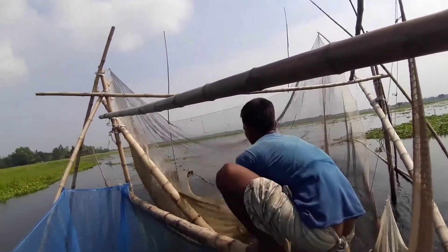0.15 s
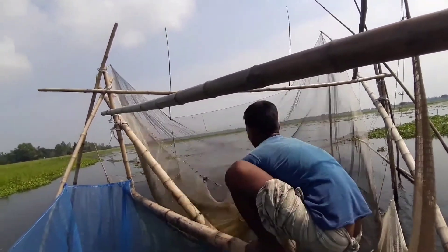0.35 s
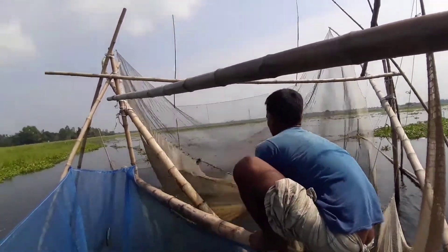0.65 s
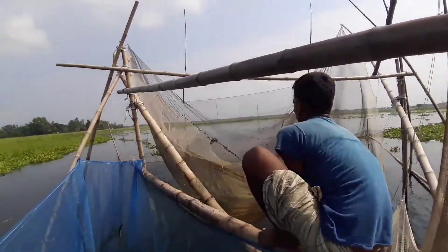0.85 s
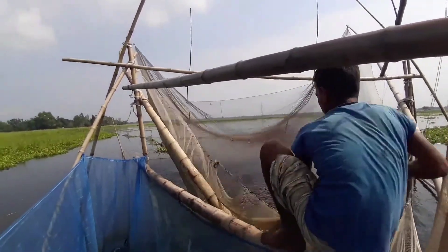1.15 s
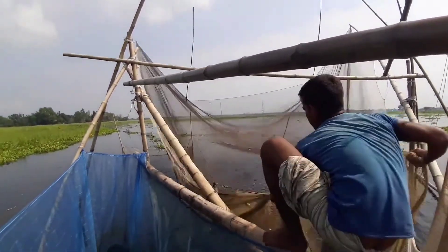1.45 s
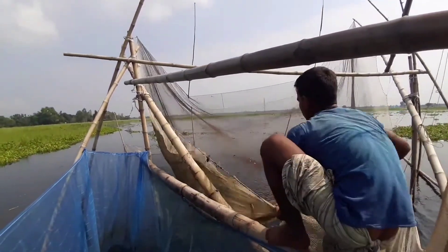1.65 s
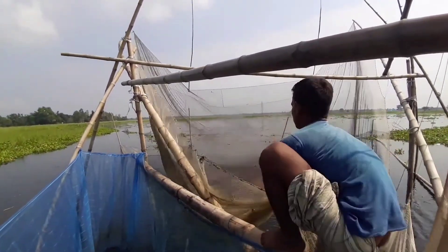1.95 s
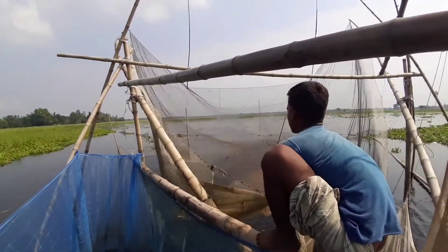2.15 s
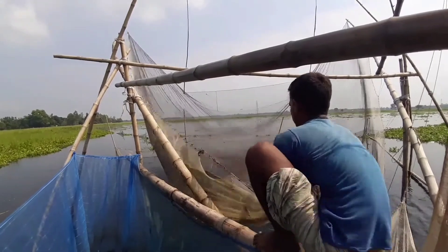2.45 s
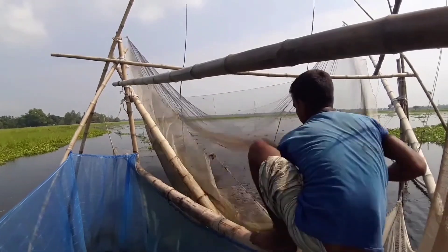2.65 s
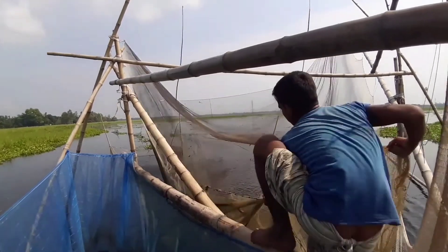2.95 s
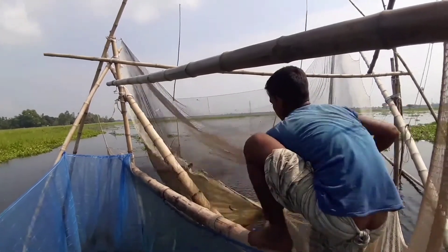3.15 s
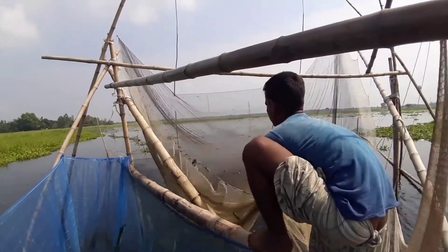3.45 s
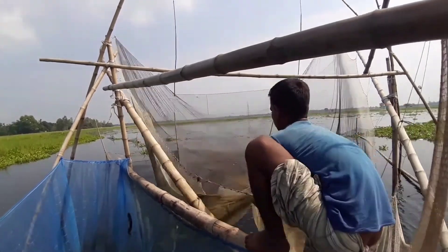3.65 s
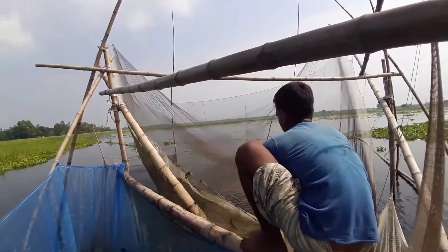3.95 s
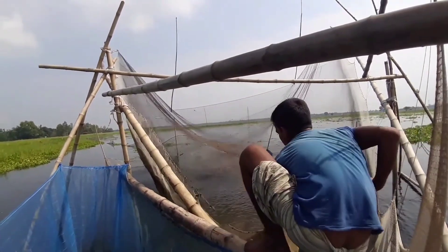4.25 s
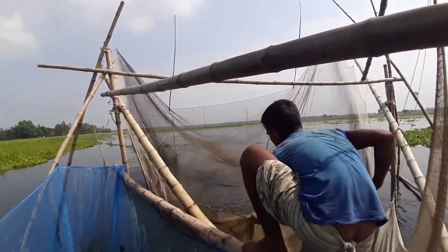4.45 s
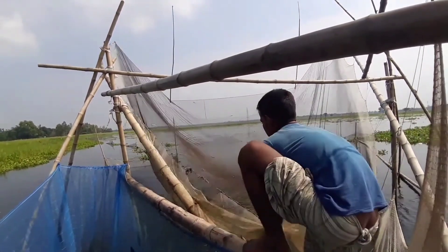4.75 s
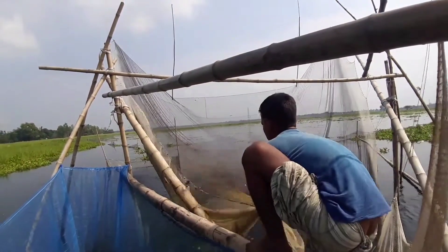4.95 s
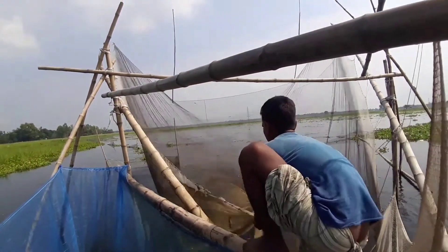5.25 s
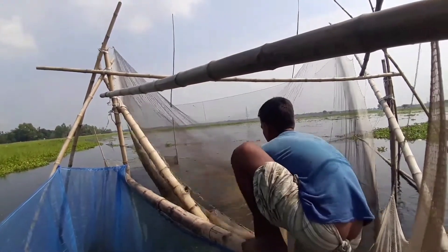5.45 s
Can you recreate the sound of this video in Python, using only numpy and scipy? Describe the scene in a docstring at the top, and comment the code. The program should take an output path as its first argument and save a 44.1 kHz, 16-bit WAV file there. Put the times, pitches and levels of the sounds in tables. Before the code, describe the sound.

Close, wet outdoor sound: small waves slosh in uneven bursts, drops tick crisply off mesh, and trapped air plops and glugs. Quiet trickling fills the gaps over a faint airy hush. After a sparser middle, water gushes and drums on hollow boards, eases briefly, then splashes busily again to the end. Low wind buffeting on the stereo microphone swells late; there is almost no echo.

```python
"""Water laps, glugs and trickles around a lift net and its bamboo frame, heard from a boat on a flooded field.
Laps and trickle are clouds of ringing bubbles over coloured noise; splashes are dying noise bursts.
Drops ping off the mesh, air pockets plop, cavities glug upward, and two bigger surges drum on hull modes.
A faint chirp sounds in two notes; behind lie the field's hush and a light wind rumbling on the microphone ports."""
import sys
import numpy as np
from scipy import signal
from scipy.fft import rfft, irfft, next_fast_len
from scipy.io import wavfile
from scipy.ndimage import uniform_filter1d, map_coordinates

SR = 44100
rng = np.random.default_rng(int(sys.argv[2]) if len(sys.argv) > 2 else 0)


def inscribe(sig):
    """Save sig as 16-bit PCM at rate SR to the path in sys.argv[1].

    A 1-D sig is mono; a 2-D sig holds one channel per row.
    Samples are clipped to [-1, 1] before scaling.
    """
    pcm = np.round(np.clip(np.atleast_2d(sig).T, -1, 1) * 32767)
    wavfile.write(sys.argv[1], SR, pcm.astype(np.int16))


N = 247401

# waves lapping through the net; rise and fall span 20 dB:
# (crest [s], rise [s], slosh fall [s], slosh level [dB], churn level [dB], spray level [dB])
LAPS = [(.01, 0.016, 0.18, -56, -50, -73), (.29, 0.016, 0.42, -69, -54.5, -58.5),
        (0.622, 0.065, 0.23, -46, -53, -48), (.87, 0.089, 0.29, -47, -46.5, -49.5),
        (1.29, 0.045, 0.31, -62, -62.5, -53.5), (1.564, 0.012, 0.11, -60, -57, -47),
        (1.681, 0.05, 0.21, -50.5, -51, -46.5), (2.199, 0.042, 0.1, -58, -60, -50),
        (2.5, 0.77, 0.97, -56, -67, -57), (2.95, 0.13, 0.23, -57.5, -86, -58),
        (3.41, 0.057, 0.059, -51.5, -74, -53.5), (3.59, .04, 0.1, -57, -53, -43),
        (3.67, 0.05, 0.21, -51.5, -57, -55), (3.923, 0.075, 0.4, -53.5, -66, -49.5),
        (4.02, 0.071, 0.14, -56, -76, -65), (4.248, 0.057, 0.35, -56, -85, -51),
        (4.389, 0.044, 0.076, -47.5, -37, -42.5), (4.55, 0.32, 0.27, -50, -38, -70),
        (4.68, .08, 0.17, -51, -61, -50.5), (4.87, 0.13, 0.31, -56, -54.5, -51.5),
        (5.048, 0.021, 0.067, -55.5, -52, -50.5), (5.29, 0.11, 0.23, -50.5, -49.5, -44),
        (5.358, 0.055, 0.038, -57, -43.5, -36), (5.45, 0.18, 0.094, -54.5, -51.5, -57.5)]
CHURN_FALL_RATIO, SPRAY_FALL_RATIO = 0.74, 0.79  # over the slosh fall
# flow of the steady trickle from the mesh, used about its mean: (time [s], level [dB])
TRICKLE = [(0.0, -54), (0.58, -68.5), (0.83, -54.5), (1.36, -60.5), (1.64, -56), (1.95, -61), (2.47, -56.5),
           (2.83, -59), (3.12, -55.5), (3.39, -60.5), (4.33, -65), (4.53, -48.5), (4.98, -70), (5.13, -60),
           (5.28, -73.5), (5.61, -57.5)]
FLOW_SPRAY_DB, FLOW_SLOSH_DB, FLOW_CHURN_DB = -60, -65, -80  # each part at the mean flow
SLOSH_DB_PER_FLOW_DB, CHURN_DB_PER_FLOW_DB = 0.86, 3.7
# spectrum of deep churning: (frequency [Hz], gain [dB])
CHURN = [(130, -57), (250, -15.5), (400, -8), (560, 1), (750, 1.5), (1100, 10), (2200, -29)]
# spectrum of the froth: (frequency [Hz], gain [dB])
SLOSH = [(400, -41), (650, -22), (850, -7.5), (1100, -1.5), (1700, 0), (2500, 5.5), (3600, 0.5), (5500, 2),
         (9000, -55)]
# spectrum of the spray: (frequency [Hz], gain [dB])
SPRAY = [(1200, -7), (2500, 0.5), (3800, 1), (5200, -2.5), (7000, 4), (9200, 6), (9800, 1.5), (15500, 1)]
# crests breaking: (time [s], level [dB], pitch [Hz], t60 [s], spray over gush [dB])
SPLASHES = [(.005, -38, 1010, 0.075, -17), (.266, -39.5, 2930, 0.11, -42), (.283, -44, 1140, 0.12, 4),
            (.592, -35, 2680, 0.16, -20), (.848, -36, 715, 0.032, -23), (1.556, -44.5, 1480, 0.48, -2),
            (1.71, -37.5, 1160, 0.026, 4), (1.801, -44, 1520, 0.14, 2), (2.178, -37.5, 975, .034, 5),
            (2.941, -38.5, 2700, 0.081, -14), (3.565, -38.5, 1700, 0.06, 2),
            (3.918, -29.5, 1030, 0.023, 8.5), (4.361, -29, 1720, 0.032, -6), (4.525, -39, 920, 0.45, -17),
            (5.189, -36.5, 1430, 0.12, -16), (5.229, -35, 1400, 0.15, -3), (5.274, -30, 825, 0.14, -6),
            (5.349, -29.5, 1110, .08, 7.5)]
# nearest drops hitting the surface: (time [s], level [dB], pitch [Hz], lead at the left port [ms])
DROPS = [(.039, -37, 8200, 0), (.182, -29.5, 12100, .01), (.279, -25.5, 3020, -.29),
         (.282, -26.5, 6050, -.29), (.428, -39, 8100, 0), (0.598, -26.5, 3380, .22),
         (0.611, -33, 3550, .22), (0.625, -30.5, 6300, .2), (0.94, -28, 7700, .02), (.992, -36.5, 7700, 0),
         (1.083, -36.5, 8300, 0), (1.353, -42, 10100, 0), (1.558, -27.5, 7900, -.11),
         (1.672, -27.5, 8750, -.11), (1.836, -31, 5700, .02), (2.027, -33, 8950, .04),
         (2.214, -34, 7400, -0.0017), (2.319, -31, 8750, .11), (2.356, -30.5, 8200, .09),
         (2.63, -33.5, 8800, 0), (3.035, -32, 9800, 0), (3.071, -32, 3100, .05), (3.397, -39.5, 4300, .02),
         (3.672, -29.5, 4000, .18), (3.764, -33, 6570, -.3), (3.924, -23.5, 8900, .09),
         (3.974, -31.5, 7300, 0), (4.13, -37, 10500, 0), (4.335, -29.5, 7240, .04),
         (4.423, -30, 1410, 0.153), (4.562, -27.5, 8600, .12), (4.563, -25.5, 3320, .18),
         (4.593, -21, 6800, -.13), (4.687, -28, 8900, -.11), (5.107, -33, 9000, .13),
         (5.194, -30.5, 6700, .02), (5.266, -27, 7500, .13), (5.319, -25, 6940, .13),
         (5.352, -32, 7600, .13), (5.361, -29, 4140, .13)]
DRIP_DB, DRIP_SPREAD_DB, DRIP_HZ, DRIP_SPREAD_OCTAVES = -43, 13.5, 9300, 0.27  # smaller random drips
# air pockets snapping shut: (time [s], level [dB], starting pitch [Hz])
PLOPS = [(.162, -36, 1510), (0.357, -35.5, 1275), (0.409, -51, 1400), (0.592, -23.5, 1750),
         (0.721, -43.5, 870), (.915, -34.5, 1150), (1.283, -33.5, 2100), (1.607, -30, 2050),
         (1.833, -34, 1600), (2.312, -34.5, 2230), (2.859, -28, 1740), (2.983, -30, 1880),
         (3.035, -47, 1090), (3.395, -34, 2120), (3.587, -32.5, 1430), (3.671, -26.5, 1760),
         (4.537, -19.5, 1018), (4.823, -37, 1460), (4.871, -28.5, 1570), (5.109, -38, 1350),
         (5.138, -31.5, 1380), (5.255, -26.5, 557), (5.292, -31, 990), (5.316, -19, 1310),
         (5.374, -38, 1240), (5.403, -34, 567)]
PLOP_T60_CYCLES = 31.6  # so big pockets ring longer
# shrinking air cavities: (time [s], level [dB], middle pitch [Hz], length [s])
GLUGS = [(.323, -49, 268, 0.035), (0.385, -47, 275, 0.028), (.41, -52.5, 166, .06),
         (1.618, -49.5, 583, 0.038), (1.696, -49, 1100, 0.025), (1.936, -52, 305.5, 0.059),
         (2.11, -53, 1110, 0.021), (2.196, -52.5, 605, 0.021), (2.216, -52, 1020, 0.016),
         (2.234, -51, 1119, 0.058), (2.462, -49.5, 244, .027), (2.63, -46.5, 164, 0.026),
         (2.672, -39, 252, 0.023), (2.785, -49, 854, 0.025), (2.8, -47.5, 1460, .022),
         (3.335, -49.5, 137, 0.036), (3.434, -59, 340, 0.069), (3.632, -43, 640, .03),
         (3.818, -53.5, 235, 0.044), (4.396, -32, 167, 0.0264), (5.061, -46.5, 256, 0.041),
         (5.463, -47.5, 1684, 0.035)]
GLUG_OCTAVES_PER_S = 22.8  # climb of every cavity, before its waver
# surges striking the hull: (time [s], level [dB])
BLOWS = [(4.385, -23.5), (4.406, -23), (4.419, -19), (4.474, -19.5), (4.49, -25.5), (4.535, -20.5),
         (4.562, -22.5), (5.253, -23), (5.289, -26), (5.316, -21.5), (5.358, -28.5)]
# modes of the hull: (frequency [Hz], width [Hz], gain [dB])
HULL = [(168, 270, -9), (556, 88, 0.5), (1065, 99, -1.5), (1530, 83, -9), (2060, 114, -5.5)]
# soft bumps of the rocking boat: (time [s], level [dB])
BUMPS = [(2.167, -50), (2.342, -46.5), (3.068, -50), (3.344, -47.5), (4.124, -41.5), (4.17, -44),
         (4.301, -43), (4.327, -35), (4.863, -44), (5.345, -41), (5.437, -46)]
BUMP_HZ = 86
# faint high chirp in two notes: (time [s], pitch [Hz], level [dB])
CHIRP = [(1.12, 4100, -69), (1.142, 4280, -47), (1.165, 4280, -50), (1.183, 4350, -56),
         (1.198, 4260, -46.5), (1.215, 4030, -46), (1.24, 3920, -79)]
# scatter from hull, poles and water: (frequency [Hz], t60 [s])
SCATTER = [(200, 0.022), (2000, 0.15), (10000, 0.017)]
# stereo width of everything but drops and wind: (frequency [Hz], side gain [dB])
WIDTH = [(100, 7), (500, -3.5), (2000, -3), (5000, 1), (7000, 0.5), (9500, -29.5), (14000, -30)]
# spectrum of the field's hush: (frequency [Hz], gain [dB])
AIR = [(88, -35), (150, -7), (453, -16), (1340, 8), (1700, 9.5), (2860, 1.5), (3830, 3.5), (5230, 5),
       (8660, 8.5), (14300, 5), (15500, -37)]
# puffs of wind; the sign of the width has no effect and a zero width is silent:
# (crest [s], width to swell or fade by 20 dB [s], rumble level [dB])
GUSTS = [(.37, -0.4, -65.5), (.82, .13, -58), (1.14, .13, -60.5), (1.65, 0.5, -61.5), (1.92, 0.6, -60),
         (2.28, 0.2, -61.5), (2.63, 0.43, -57), (3.1, 0, -57), (3.38, 0.22, -58.5), (3.88, 0.27, -55.5),
         (4.15, 0.02, -55), (4.36, 0.31, -48.5), (4.52, -0.04, -46), (4.72, 0.12, -49.5), (4.87, .13, -50),
         (5.22, .14, -52.5), (5.35, 0.4, -49.5), (5.48, -0.2, -56)]
# spectrum of wind on the ports: (frequency [Hz], gain [dB])
RUMBLE = [(20, -21.5), (35, -14), (52, -0.5), (68, -4), (90, -4), (160, -13), (260, -22.5), (500, -42.5),
          (1500, -92)]
BREEZE_DB, LUMPS_DB, LUMPS_PER_S = -80, 2.5, 18  # rumble between puffs; depth and rate of the buffeting
TOP_HZ = 15780


def stirred_water():
    """Laps and trickle: deep churning, a froth of bubbles, and a crackle of spray draining from the mesh."""
    slosh_gain, churn_gain, spray_gain = stirring_gains()
    pockets = bubbles(count=2500, low_hz=212.6, high_hz=848, cycles=6.9, rise=0.35, spread_db=3.5)
    froth = bubbles(count=3200, low_hz=650, high_hz=4800, cycles=22, rise=.2, spread_db=4)
    crackle = bubbles(count=7000, low_hz=3000, high_hz=16000, cycles=9, rise=.1, spread_db=4.5)

    churn = churn_gain * amp(-6.0) * wash(pockets, CHURN, lead_ms=0.33, diffuse_db=-17)

    froth_wash = wash(froth, SLOSH, lead_ms=0.17, diffuse_db=-6.5)
    slosh = slosh_gain * amp(1.28) * patchy(froth_wash, depth_db=3.5)

    spurts_db = 1.9 * wobble(130)  # the mesh sheds its water in quick spurts
    spray_wash = wash(crackle, SPRAY, lead_ms=0.0082, diffuse_db=11.5)
    spray = spray_gain * amp(spurts_db + 2.5) * patchy(spray_wash, depth_db=3.0)
    return churn + slosh + spray


def stirring_gains():
    """Gains of slosh, churn and spray: waves on top of a trickle that bubbles more as it flows faster."""
    flow_db = curves(TRICKLE)[0]
    flow_db = flow_db - flow_db.mean()
    slosh = swells([(s, rise, fall, db) for s, rise, fall, db, _, _ in LAPS])
    churn = swells([(s, rise, fall * CHURN_FALL_RATIO, db) for s, rise, fall, _, db, _ in LAPS])
    spray = swells([(s, rise, fall * SPRAY_FALL_RATIO, db) for s, rise, fall, _, _, db in LAPS])
    steady = amp([FLOW_SLOSH_DB + SLOSH_DB_PER_FLOW_DB * flow_db,
                  FLOW_CHURN_DB + CHURN_DB_PER_FLOW_DB * flow_db,
                  FLOW_SPRAY_DB + flow_db])
    return np.sqrt(np.array([slosh, churn, spray]) + steady ** 2)


def bubbles(count, low_hz, high_hz, cycles, rise, spread_db):
    """A cloud of ringing bubbles of rms 1; each climbs in pitch as it nears the surface."""
    start, pitch, life, strength = rng.random((count, 4)).T
    hz = low_hz * (high_hz / low_hz) ** pitch
    samples = (cycles * (.5 + life) / hz * SR).astype(int) + 1
    # all bubbles laid end to end: owner and sample index within it
    which = np.repeat(np.arange(count), samples)
    k = np.arange(len(which)) - (np.cumsum(samples) - samples)[which]
    age = k / samples[which]
    turns = k / SR * hz[which]
    loudness = amp(-spread_db * np.log(1 - .97 * strength))[which]
    envelope = (1 - age) ** 2 * np.exp(-2 * age) * (1 - np.exp(-turns))
    ring = loudness * envelope * np.sin(2 * np.pi * turns * (1 + rise * age / 2))
    position = (start * N).astype(int)[which] + k
    return unit(np.bincount(position, ring, N)[:N])


def wash(grains, spectrum, lead_ms, diffuse_db):
    """Near bubbles from one bearing, on the diffuse rush of the many further away."""
    diffuse = amp(diffuse_db) * rng.standard_normal((2, N))
    return coloured(ports(grains, lead_ms) + diffuse, spectrum)


def patchy(pair, depth_db):
    """Clusters of like-sized droplets lift and dim small patches of time and frequency."""
    z = signal.stft(pair, nperseg=256)[2]
    field = rng.standard_normal(z.shape[1:])
    for axis in (0, 1):
        field = uniform_filter1d(field, size=5, axis=axis)
    return unit(signal.istft(z * amp(depth_db * unit(field)), nperseg=256)[1][:, :N])


def splashes():
    """A wave breaks at once into a gush and a hiss of spray that die together."""
    out, t = np.zeros(N), np.arange(SR // 4) / SR
    attack = 1 - np.exp(-t / .003)
    for s, db, hz, t60_s, spray_db in SPLASHES:
        gush = burst(t, t60_s, lambda f: resonance(f, hz, 0.74 * hz) ** 2)
        hiss = burst(t, t60_s, lambda f: amp(along(SPRAY, f)))
        add(out, s, amp(db) * (gush + amp(spray_db) * hiss) * attack)
    return out


def drops():
    """A drop lands at its own bearing, pings for a few cycles and leaves a fizz that spreads around it."""
    out, t = np.zeros((2, N)), np.arange(SR // 16) / SR
    for s, db, hz, lead_ms in DROPS + drips(count=30):
        age = t * hz / 1.3
        ping = age * np.exp(1 - age) * np.sin(2 * np.pi * hz * t)
        crack = burst(t, .011, lambda f: resonance(f, hz, 1.2 * hz)) * (1 - np.exp(-t / .0003))
        centre, spread = [burst(t, 0.065, lambda f: resonance(f, hz, 0.6 * hz)) for _ in range(2)]
        fizz = amp(-11.5) * centre + amp(-17.5) * np.array([spread, -spread])
        landing = ports(amp(-2.5) * ping + crack, lead_ms) + fizz
        for channel, sound in zip(out, landing):
            add(channel, s, amp(db) * sound)
    return out


def drips(count):
    """Rows like those of DROPS for the small drips off the mesh almost straight ahead."""
    when, size, pitch, bearing = rng.uniform(-1, 1, (count, 4)).T
    time_s = (when + 1) / 2 * N / SR
    level_db = DRIP_DB + DRIP_SPREAD_DB * size
    pitch_hz = DRIP_HZ * 2 ** (DRIP_SPREAD_OCTAVES * pitch)
    return list(zip(time_s, level_db, pitch_hz, 0.022 * bearing))


def plops():
    """A trapped pocket of air rings briefly at a rising pitch, with a wet smack around it."""
    out, t = np.zeros(N), np.arange(SR // 8) / SR
    for s, db, hz in PLOPS:
        t60_s = PLOP_T60_CYCLES / hz
        envelope = amp(-60 * t / t60_s) * (1 - np.exp(-t / .0014))
        ring = np.sin(2 * np.pi * hz * t * (1 + 3 * t)) * envelope
        smack = burst(t, 0.5 * t60_s, lambda f: resonance(f, hz, 0.33 * hz) ** 2)
        add(out, s, amp(db - 7.5) * (ring / np.abs(ring).max() + amp(2.5) * smack))
    return out


def glugs():
    """Water squeezes a cavity, so that its ragged note climbs while the water gurgles around it."""
    out, t = np.zeros(N), np.arange(SR // 6) / SR
    for s, db, middle_hz, length_s in GLUGS:
        u = np.linspace(0, 1, int(length_s * SR))
        waver, flutter = [map_coordinates(rng.standard_normal(8), [u * 7]) for _ in range(2)]
        hz = middle_hz * 2 ** (GLUG_OCTAVES_PER_S * length_s * (u - .5)) * (1 + 0.112 * waver)
        note = np.sin(np.pi * u) * np.sin(2 * np.pi * np.cumsum(hz) / SR)
        add(out, s, amp(db - 2.5 + 2.0 * flutter) * note)
        gurgle = burst(t, 4.8 * length_s, lambda f: resonance(f, 1.03 * middle_hz, 1.26 * middle_hz) ** 2)
        add(out, s, amp(db + 1.5) * gurgle * (1 - np.exp(-t / .025)))
    return out


def hull():
    """Each blow of a surge is a short rattle of water on the modes of the hollow boards."""
    def boards(f):
        # neighbouring modes alternate in sign
        return sum((-1) ** k * amp(db) * resonance(f, hz, width_hz)
                   for k, (hz, width_hz, db) in enumerate(HULL))

    out, t = np.zeros(N), np.arange(SR // 8) / SR
    for s, db in BLOWS:
        add(out, s, amp(db - 7.5) * burst(t, 0.057, boards))
    return out


def bumps():
    """The rocking boat bumps softly: a low sine in a Gaussian envelope."""
    out, t = np.zeros(N), np.arange(SR // 8) / SR
    thud = np.sin(2 * np.pi * BUMP_HZ * t) * np.exp(-((t - .01) / 0.0054) ** 2)
    for s, db in BUMPS:
        add(out, s, amp(db) * thud)
    return out


def chirp():
    """A thin, quavering note sounds twice: a sine of jittered pitch and level."""
    hz, db = curves(CHIRP)
    t = np.arange(N) / SR
    sounding = (t > CHIRP[0][0]) & (t < CHIRP[-1][0])
    quaver = 1 + .025 * wobble(600)
    return sounding * amp(db + 0.7 * wobble(200)) * np.sin(2 * np.pi * np.cumsum(hz * quaver) / SR)


def field_air():
    """The hush of the open field: steady coloured noise, independent per channel."""
    return amp(-63) * coloured(rng.standard_normal((2, N)), AIR)


def wind():
    """Low buffeting that swells with each puff: unrelated noise on the two ports, lumps in common."""
    pair = coloured(rng.standard_normal((2, N)), RUMBLE)
    puffs = swells([(s, width_s, width_s, db) for s, width_s, db in GUSTS])
    strength = np.sqrt(puffs + amp(BREEZE_DB) ** 2)
    return strength * amp(LUMPS_DB * wobble(LUMPS_PER_S)) * pair * amp([[-1.3], [1.3]])


def placed(x, lead_ms, scatter_db):
    """A source left of centre; the boat and poles scatter a short tail."""
    hz, t, z = signal.stft(rng.standard_normal((2, SR // 6)), SR, nperseg=256)
    decay = amp(-60 * t / along(SCATTER, hz)[:, None])
    tail = signal.istft(z * decay, SR, nperseg=256)[1]
    scattered = signal.fftconvolve(x[None], tail / np.linalg.norm(tail[0]), axes=1)[:, :N]
    return ports(x, lead_ms) + amp(scatter_db) * scattered


def ports(x, lead_ms):
    """Left and right signals of a sound that reaches the left port lead_ms before the right."""
    sides = np.array([[1], [-1]])
    return filtered(x, lambda hz: np.exp(1j * np.pi * hz * lead_ms / 1000 * sides))


def narrowed(pair):
    """Side signal shaped by WIDTH: wide in the lows, near the centre in the top treble."""
    mid = (pair[0] + pair[1]) / 2
    side = filtered((pair[0] - pair[1]) / 2, lambda hz: amp(along(WIDTH, hz)))
    return np.array([mid + side, mid - side])


def swells(rows):
    """Summed power of (crest s, rise s, fall s, dB) swells that grow and die away evenly in dB."""
    t, power = np.arange(N) / SR, np.zeros(N)
    for crest_s, rise_s, fall_s, db in rows:
        away = np.maximum((crest_s - t) / rise_s, (t - crest_s) / fall_s)
        near = away < 3  # cut 60 dB below the crest
        power[near] += amp(db - 20 * away[near]) ** 2
    return power


def burst(t, t60_s, response):
    """Dying noise through a response, with peak 1."""
    x = filtered(rng.standard_normal(len(t)) * amp(-60 * t / t60_s), response)
    return x / np.abs(x).max()


def resonance(f, hz, width_hz):
    """Response of one damped mode."""
    return 1j * f * width_hz / (hz * hz - f * f + 1j * f * width_hz)


def add(track, s, sound):
    """Mix a sound into a track at time s."""
    part = track[max(round(s * SR), 0):][:len(sound)]
    part += sound[:len(part)]


def amp(db):
    """Decibels to gain."""
    return 10 ** (np.asarray(db) / 20)


def unit(x):
    """Scale to rms 1."""
    return x / np.sqrt(np.mean(x ** 2) + 1e-20)


def along(points, hz):
    """(Hz, value) points interpolated on a log axis."""
    f, v = np.transpose(points)
    return np.interp(np.log(hz + 1), np.log(f + 1), v)


def curves(rows):
    """One value per sample for each column after the time."""
    s, *cols = np.transpose(rows)
    return [np.interp(np.arange(N) / SR, s, c) for c in cols]


def wobble(knots_per_s):
    """A smooth random curve through normal knots."""
    knots = rng.standard_normal(int(N * knots_per_s / SR) + 4)
    return map_coordinates(knots, [np.arange(N) * knots_per_s / SR])


def filtered(x, response):
    """x times a complex response of frequency."""
    n = x.shape[-1]
    m = next_fast_len(n + SR // 10)
    return irfft(rfft(x, m) * response(np.fft.rfftfreq(m, 1 / SR)), m)[..., :n]


def coloured(x, spectrum):
    """x shaped by a (Hz, dB) spectrum, at rms 1."""
    return unit(filtered(x, lambda hz: amp(along(spectrum, hz))))


def scene():
    """Water around the bow over the hush of the open field, with wind on the ports."""
    waves = placed(amp(2.5) * splashes(), lead_ms=0.17, scatter_db=-4.5)
    hits = placed(plops() + glugs() + hull() + bumps() + chirp(), lead_ms=0.17, scatter_db=-9.5)
    surroundings = narrowed(stirred_water() + waves + hits + field_air())
    balance = amp([[.3], [-.3]])
    return (surroundings + drops()) * balance + wind()


def record(dry):
    """Band limit: nothing is kept from TOP_HZ up."""
    return filtered(dry, lambda hz: hz < TOP_HZ)


dry = scene()
out = record(dry)
inscribe(out)
```